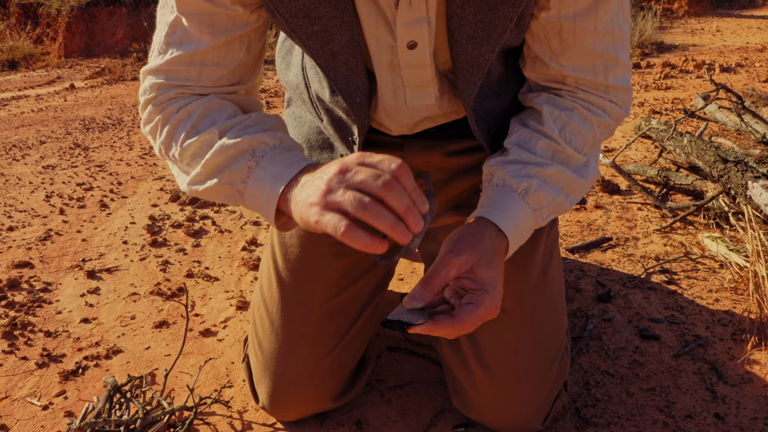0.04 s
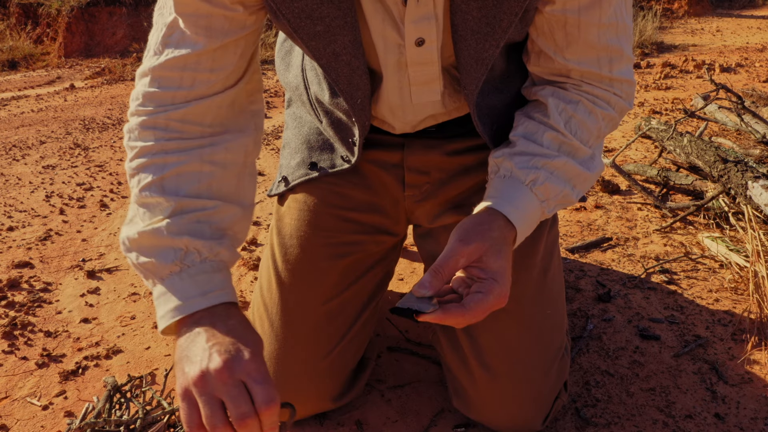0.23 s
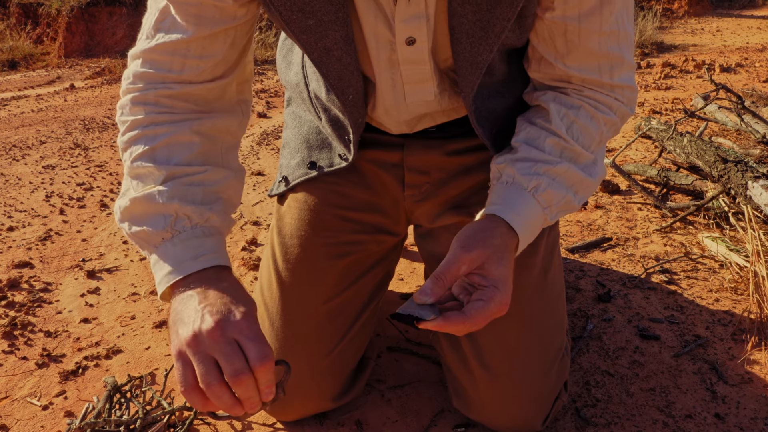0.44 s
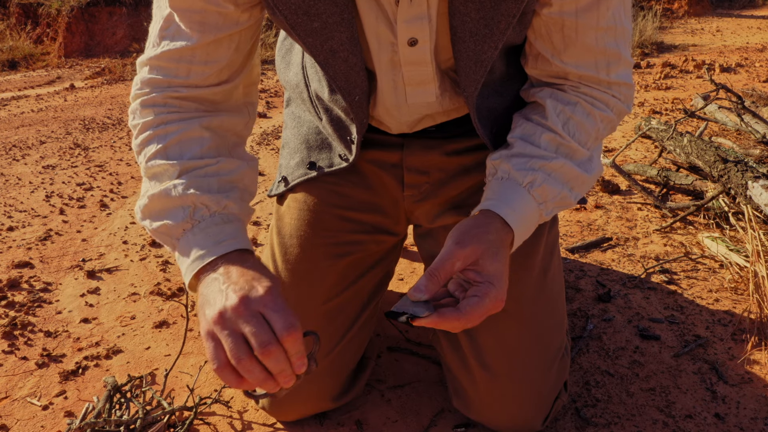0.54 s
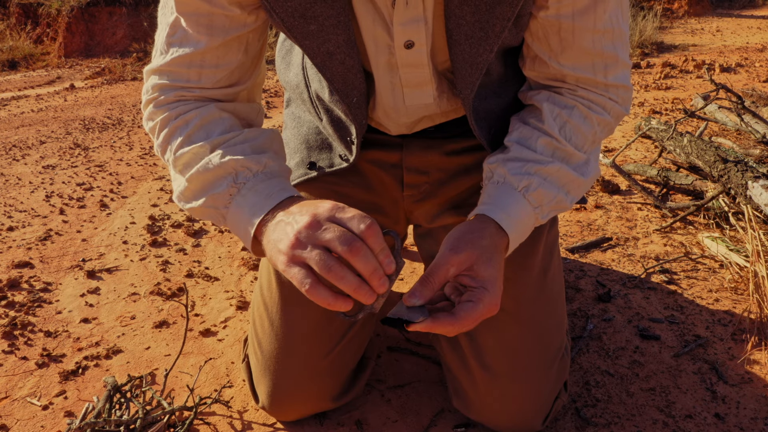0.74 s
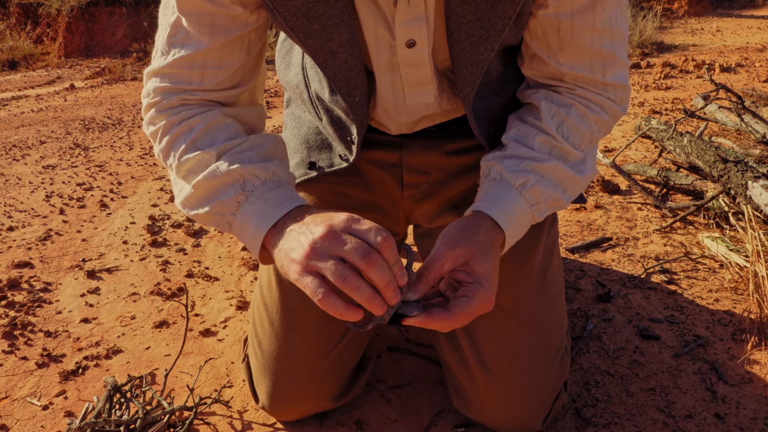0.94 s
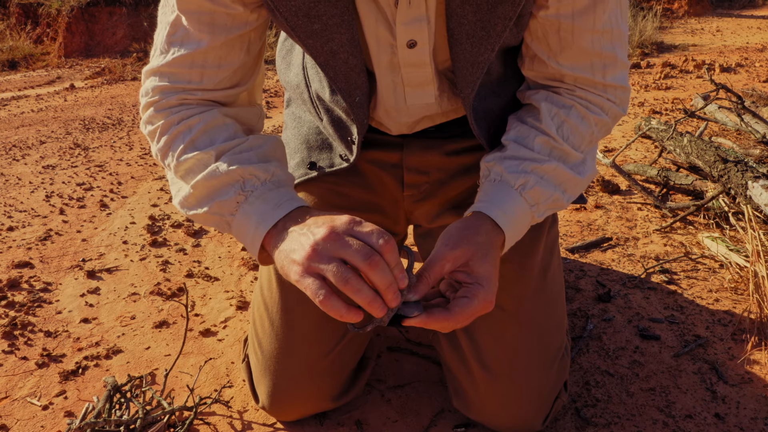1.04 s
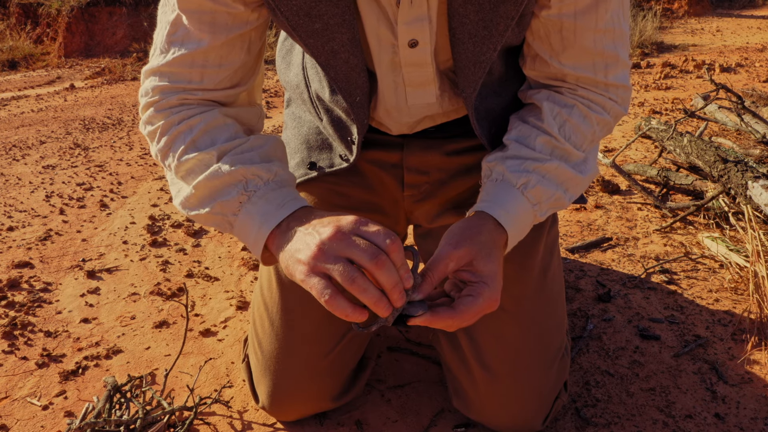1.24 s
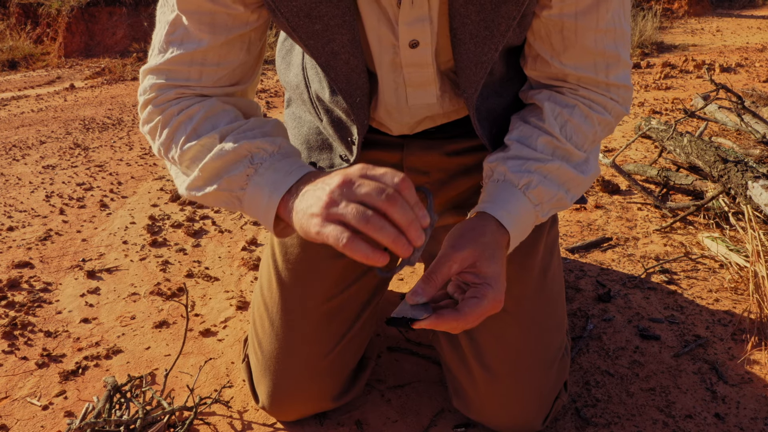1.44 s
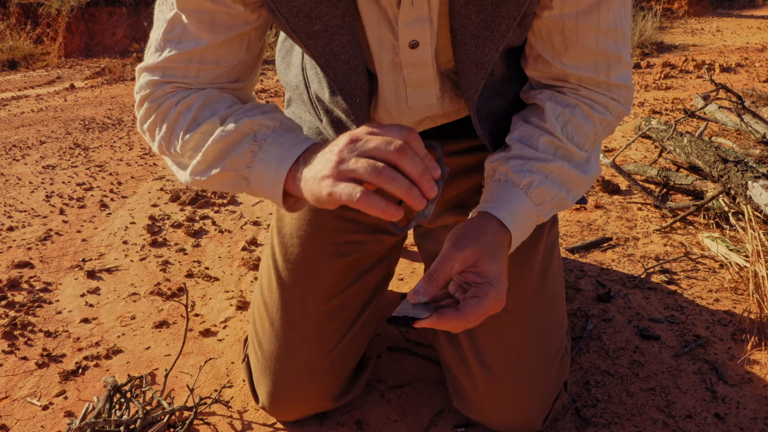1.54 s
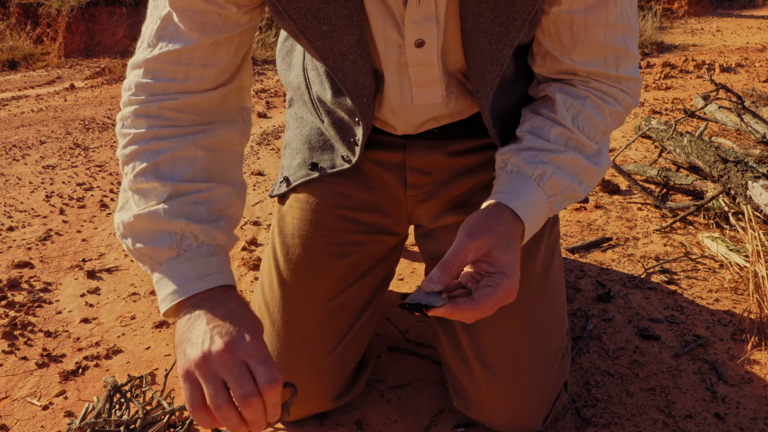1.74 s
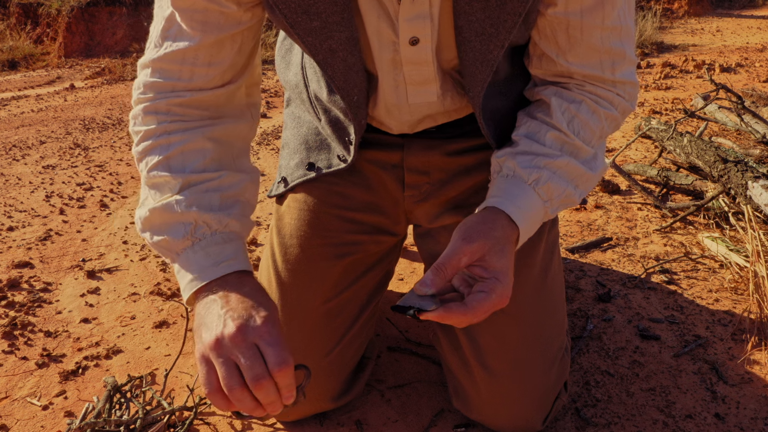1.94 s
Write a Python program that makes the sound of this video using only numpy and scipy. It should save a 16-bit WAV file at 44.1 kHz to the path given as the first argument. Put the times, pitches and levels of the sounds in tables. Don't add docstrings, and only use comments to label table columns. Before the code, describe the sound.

A steel striker glances off flint twice, sharp and scraping, amid crickets and buzzing insects outdoors

```python
import sys
import numpy as np
from scipy import signal
from scipy.fft import rfft, irfft
from scipy.io import wavfile
from scipy.ndimage import uniform_filter1d

SR = 44100
rng = np.random.default_rng(int(sys.argv[2]) if len(sys.argv) > 2 else 0)


def volts_from_decibels(level):
    exponent = np.asarray(level, float) / 20
    return 10 ** exponent


def output_pcm(signal):
    pcm = np.clip(np.atleast_2d(signal).T, -1, 1) * 32767
    wavfile.write(sys.argv[1], SR, np.round(pcm).astype(np.int16))


N = 85995
T = np.arange(N) / SR


def level(x, db):
    return x * volts_from_decibels(db) / np.sqrt(np.mean(x ** 2))


def pan(x, left_db, right_db):
    return x * volts_from_decibels(np.array([[left_db], [right_db]]))


def gains(points, size):
    p = np.array(points, float)
    bin_hz = np.fft.rfftfreq(size, 1 / SR)
    return volts_from_decibels(np.interp(np.log(bin_hz + 1), np.log(p[:, 0]), p[:, 1]))


def hiss(points):
    return irfft(rfft(rng.standard_normal(N)) * gains(points, N), N)


def colour(x, points):
    cepstrum = irfft(np.log(gains(points, 1024)))
    cepstrum[1:512] *= 2
    cepstrum[513:] = 0
    impulse = irfft(np.exp(rfft(cepstrum)))
    return signal.fftconvolve(x, impulse / np.sqrt(np.sum(impulse ** 2)))[:N]


def ring(x, hz, t60_s):
    pole = np.exp(2j * np.pi * hz / SR - np.log(1000) / (t60_s * SR))
    return signal.lfilter([1], [1, -pole], x).imag


def band(x, hz, width_hz):
    edges_hz = [hz - width_hz / 2, hz + width_hz / 2]
    return signal.sosfilt(signal.butter(2, edges_hz, "band", fs=SR, output="sos"), x)


def walk(rate_hz):
    k = int(SR / rate_hz)
    steps = np.repeat(rng.standard_normal(N // k + 1), k)
    return 1.32 * uniform_filter1d(uniform_filter1d(steps, k), k)[:N]


def clicks(per_s, spread_db):
    size = rng.standard_normal(N) * volts_from_decibels(spread_db * rng.exponential(size=N))
    return level((rng.random(N) < per_s) * size if per_s < 1 else (rng.random(N) < per_s / SR) * size, 0)


def strikes():
    # time in seconds, peak in dB, share of low thud.
    blows = [
        (0.2176, 1, .4),
        (0.2186, -5, 0),
        (0.2284, -7, 0),
        (0.2289, -9, 0),
        (0.2247, -15, 0),
        (1.6506, 1, 1),
        (1.6591, -10, 0),
        (1.6565, -13, 0),
    ]
    # start in seconds, length in seconds, level in dB.
    scrapes = [
        (0.2177, .0028, -12),
        (0.2205, .006, -20),
        (0.2257, .0068, -12),
        (0.2315, .005, -27),
        (1.6507, .0045, -17),
        (1.6545, .007, -16),
        (1.661, .004, -27),
    ]
    # frequency in Hz, level in dB, t60 in seconds.
    steel_modes = [(2050, -15, .012), (2500, -14, .012), (3500, -10, .01), (4120, -9, .016),
                   (4400, -11, .016), (4900, -7, .016), (5900, -15, .012), (7400, -8, .014),
                   (7930, 0, .018), (8760, -15, .05), (9350, -11, .018), (10900, -20, .045),
                   (11400, -12, .028), (12000, -4, .011), (14500, -13, .01)]
    # frequency in Hz, gain in dB.
    grit_colour = [(180, -31), (300, -51), (1340, -26.5), (2440, -4), (3030, -15.5), (4230, -1),
                   (6410, -10), (7820, -2), (16000, -30.5)]
    # frequency in Hz, gain in dB.
    crack_colour = [(59, -45), (100, -54), (1250, -13.5), (3700, -7), (5770, -66), (7940, 16), (9820, 34),
                    (11900, 37), (16000, 19)]
    blow, thud = np.zeros((2, N))
    for s, db, low in blows:
        blow[int(s * SR)] = volts_from_decibels(db)
        thud[int(s * SR)] = volts_from_decibels(db) * low
    drag = 0
    for s, length_s, db in scrapes:
        u = np.clip((T - s) / length_s, 0, 1)
        drag = drag + volts_from_decibels(db) * np.sqrt(np.sin(np.pi * u ** .7) + 1e-9)
    grit = drag * clicks(per_s=14000, spread_db=1.5)
    push = volts_from_decibels(-6) * blow + 0.2 * volts_from_decibels(-5) * grit
    steel = sum(volts_from_decibels(db) * ring(push, hz, t60_s) for hz, db, t60_s in steel_modes)
    edge = steel + colour(grit, grit_colour) + colour(blow, crack_colour)
    edge = signal.sosfilt(signal.butter(2, 1600, "high", fs=SR, output="sos"), edge)
    return edge + volts_from_decibels(-17) * ring(thud, hz=600, t60_s=.002)


def taps():
    # time in seconds, peak in dB, pitch in Hz, t60 in seconds.
    knocks = [
        (0.9593, -21, 4300, .0015),
        (0.9594, -29, 2600, .006),
        (0.9604, -19, 3800, .006),
        (0.9632, -28, 3200, .012),
        (0.9618, -29, 1800, .01),
        (1.7012, -37, 1500, .003),
    ]
    out = np.zeros(N)
    for s, db, hz, t60_s in knocks:
        knock = 1. * (np.arange(N) == int(s * SR))
        out = out + volts_from_decibels(db) * ring(knock, hz, t60_s)
    return out


def chirper(chirps, hz, first_sag_hz, rough_db):
    spacing_s, length_s, sag_hz = 0.0456, 0.03, 500
    out = np.zeros(N)
    for s, db in chirps:
        for k, step_db in enumerate([-3, 3, 3]):
            u = np.clip((T - s - k * spacing_s) / length_s + .5, 0, 1)
            pitch_hz = hz - sag_hz * u ** 5 - first_sag_hz * u * (k == 0)
            turn = 2 * np.pi * np.cumsum(pitch_hz) / SR
            out = out + volts_from_decibels(db + step_db) * np.sin(np.pi * u ** .8) ** 2 * np.sin(turn)
    return out * volts_from_decibels(rough_db * walk(150))


def crickets():
    # first syllable in seconds, level in dB.
    near_chirps = [(.102, -39), (.487, -39), (0.862, -38), (1.218, -36), (1.549, -35), (1.916, -38)]
    # first syllable in seconds, level in dB.
    far_chirps = [(.065, -48), (.255, -49), (.487, -44), (.745, -45), (1.01, -47), (1.1, -46), (1.33, -48),
                  (1.51, -48), (1.7, -49), (1.88, -47)]
    near = chirper(near_chirps, hz=4750, first_sag_hz=250, rough_db=1.5)
    far = chirper(far_chirps, hz=4510, first_sag_hz=60, rough_db=4)
    return pan(near, 0, -14) + pan(far, 0, -4)


def chorus():
    # resonance in Hz, width in Hz, left level in dB, right level in dB.
    resonances = [(7970, 246, -41.5, -43), (8458, 375, -40, -37), (9550, 140, -51.5, -73)]
    throb_hz, throb_s = 33.5, .0033
    turn = 2 * np.pi * throb_hz * (T - throb_s) + .2 * walk(2)
    pairing = np.clip(T, 0, 1) * np.cos(turn / 2 + 4.0)
    out = np.zeros((2, N))
    for side, (depth, pair_depth) in enumerate([(.15, .12), (.45, .3)]):
        throb = 1 + depth * np.cos(turn) + pair_depth * pairing
        for hz, width_hz, *side_db in resonances:
            wings = band(clicks(4000, 1), hz, width_hz) * throb * volts_from_decibels(1.2 * walk(9))
            out[side] += level(wings, side_db[side])
    return out


def cicada():
    # frequency in Hz, gain in dB per Hz.
    buzz_colour = [(2400, -50), (2750, -19), (4000, -5), (5500, -5.5), (7000, 1), (8300, -2), (9500, -7),
                   (12000, -34)]
    swell_hz, swell_s = 10.1, .425
    swell = np.cos(2 * np.pi * swell_hz * (T - swell_s))
    buzz = colour(clicks(12000, .5), buzz_colour) * (1 + .2 * swell)
    low = band(rng.standard_normal(N), 2970, 610) * (1 + swell)
    return pan(level(buzz, -38.5) + level(low, -58), -25, 0)


def rasps():
    # start in seconds, end in seconds, strokes per second, centre in Hz, left level in dB.
    insects = [
        (0, 1.1, 127, 11300, -47.5),
        (0, .8, 69, 14300, -48.5),
        (1.72, 1.95, 69, 14300, -46),
    ]
    right_db, duties, relative_widths = [3, 1.5, -4], [.7, .7, .4], [.3, .19, .19]
    out = 0
    for (start, end, rate_hz, hz, db), r_db, duty, width in zip(insects, right_db, duties, relative_widths):
        phase = (T - start) * rate_hz + .05 * walk(8)
        stroke = np.exp((-phase) % 1 / duty) * volts_from_decibels(1.5 * walk(12))
        on = np.clip(np.minimum(T - start + (start == 0), end - T) / .02, 0, 1)
        noise = band(rng.standard_normal((2, N)), hz, width * hz)
        out = out + pan(on * level(noise * stroke, db), 0, r_db)
    return out


def ticks():
    # time in seconds, level in dB.
    bursts = [(1.053, -42), (1.106, -38), (1.171, -39), (1.23, -38), (1.284, -37), (1.296, -41),
              (1.336, -39)]
    length_s = .008
    shape = sum(volts_from_decibels(db) * np.exp(-((T - s) / length_s * 2) ** 2) for s, db in bursts)
    noise = level(band(rng.standard_normal(N), 13500, 4200), 0)
    return pan(shape * noise, 0, -10)


def motor(curve, orders):
    s, hz, db = np.array(curve, float).T
    firing_hz = np.interp(T, s, hz) * (1 + 0.00612 * walk(5.39))
    turn = 2 * np.pi * np.cumsum(firing_hz) / SR
    tones = sum(volts_from_decibels(order_db + 2.9 * walk(9.01)) * np.sin(m * turn) for m, order_db in orders)
    return np.sqrt(2) * volts_from_decibels(np.interp(T, s, db, left=-120)) * tones


def drones():
    # time in seconds, firing rate in Hz, level in dB.
    far_motor = [
        (0, 62, -41),
        (.55, 62, -40),
        (1.1, 62, -45),
        (1.5, 60, -49),
        (1.75, 58, -51),
        (1.95, 58, -56),
    ]
    # multiple of the firing rate, level in dB.
    motor_orders = [(1, -0.5), (2, -7), (3, -25), (2.4, -17.5), (3.53, -25)]
    # time in seconds, firing rate in Hz, level in dB.
    rev = [
        (1.8, 82, -66),
        (1.865, 85, -45),
        (1.9, 87, -44),
        (1.95, 84, -52),
    ]
    # multiple of the firing rate, level in dB.
    rev_orders = [(1, 1.5), (2, -9.5), (3, -18.5), (4, -21)]
    # frequency in Hz, level in dB.
    hum_tones = [(62, -58.5), (113, -56.5), (120, -58), (229, -63), (240, -63.5)]
    hum = sum(motor([(0, hz, db), (2, hz, db)], [(0.98, 0)]) for hz, db in hum_tones)
    wind = level(hiss([(2, -12), (7, 0), (14, -16), (40, -30), (100, -60)]), -36.5)
    wind = wind * volts_from_decibels(-3.5 * (T - 1))
    return np.array([hum, motor(far_motor, motor_orders) + motor(rev, rev_orders) + wind])


def air():
    # frequency in Hz, level in dB per Hz.
    left_colour = [(20, -53), (110, -29.5), (400, -39), (2500, -47.5), (4500, -34), (6800, -34.5),
                   (10500, -29.5), (15700, -30)]
    # frequency in Hz, level in dB per Hz.
    right_colour = [(20, -21), (150, -22), (500, -44), (2500, -48.5), (7000, -25), (10000, -29.5),
                    (15700, -37.5)]
    left = level(hiss(left_colour), -41.5) * volts_from_decibels(0.41 * walk(9.33))
    right = level(hiss(right_colour), -38) * volts_from_decibels(0.41 * walk(9.33))
    shared = level(hiss([(200, 3.5), (1200, -4.5), (2500, -1.5), (5000, -12.5)]), -60.5)
    return np.array([left, right]) + shared


def scene():
    bed = crickets() + chorus() + cicada() + rasps() + ticks() + drones() + air()
    return strikes() + taps() + bed


def low_pass(x):
    return signal.sosfilt(signal.butter(12, 16960, fs=SR, output="sos"), x)


def record(dry):
    ceiling, top_hz = 1.1, 15750
    x = ceiling * np.tanh(dry / ceiling)
    x = signal.sosfilt(signal.ellip(10, .2, 70, top_hz, fs=SR, output="sos"), x)
    return low_pass(np.clip(x, -1, 1))


dry = scene()
out = record(dry)
output_pcm(out)
```